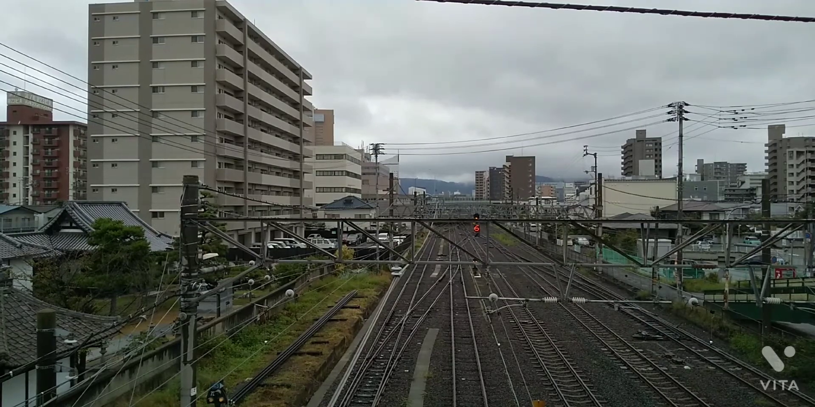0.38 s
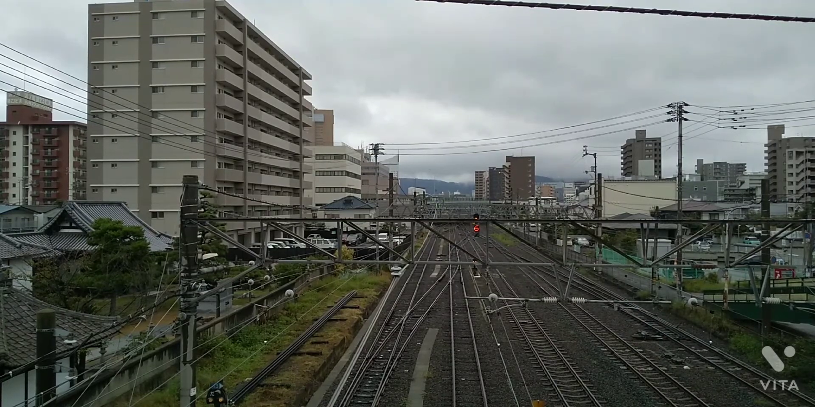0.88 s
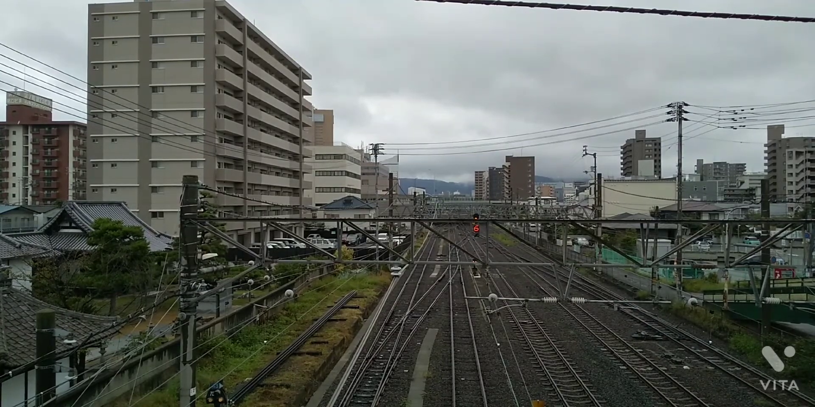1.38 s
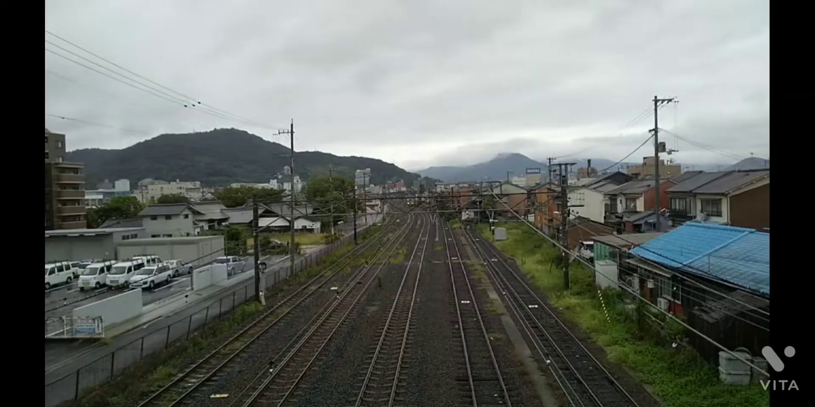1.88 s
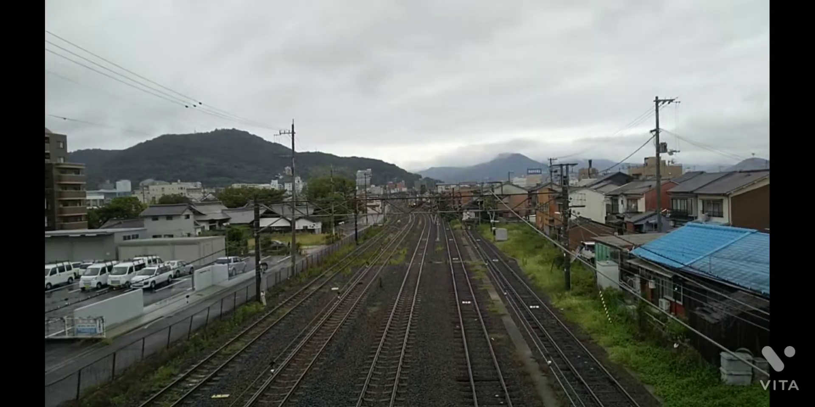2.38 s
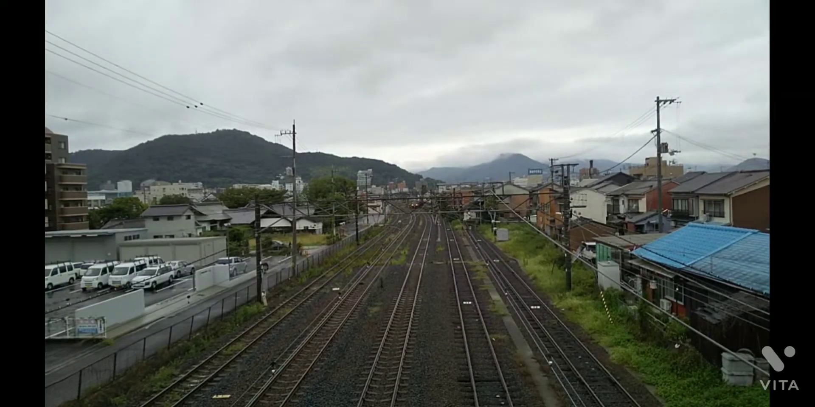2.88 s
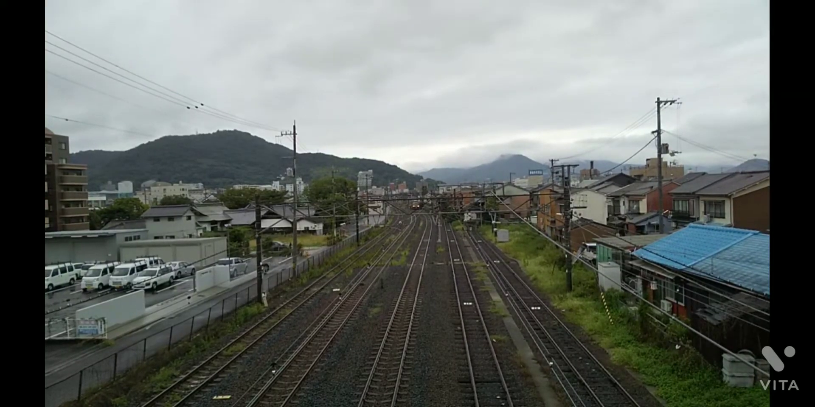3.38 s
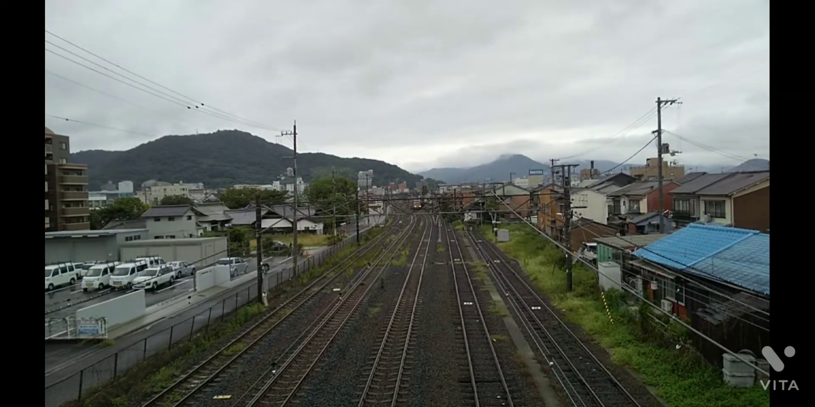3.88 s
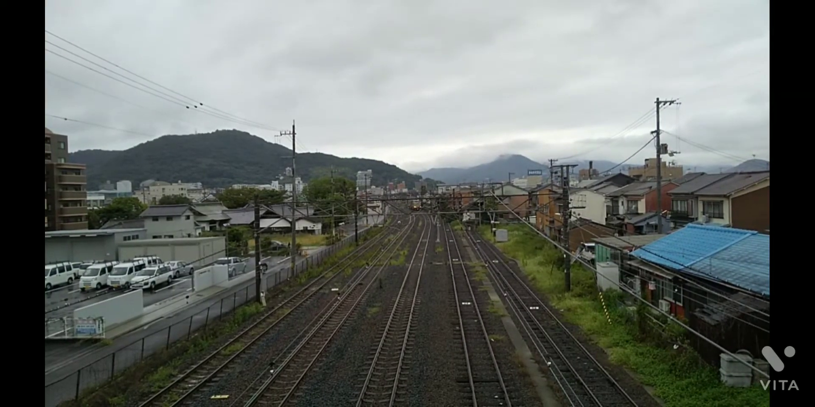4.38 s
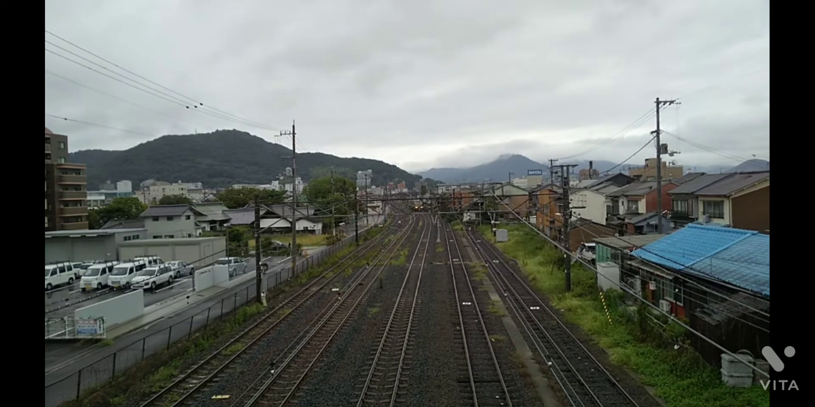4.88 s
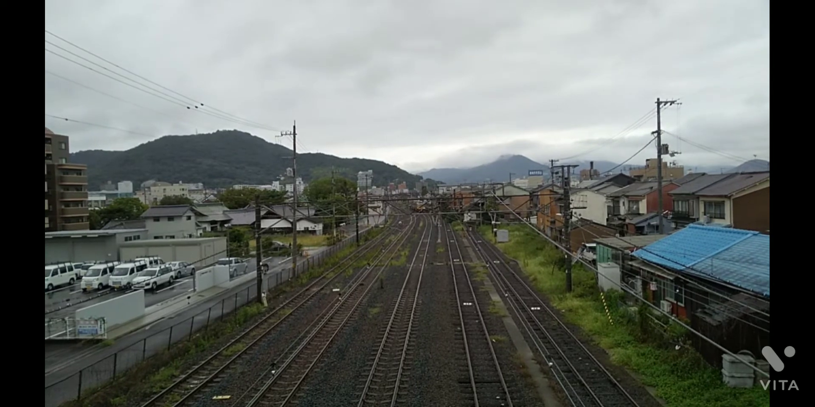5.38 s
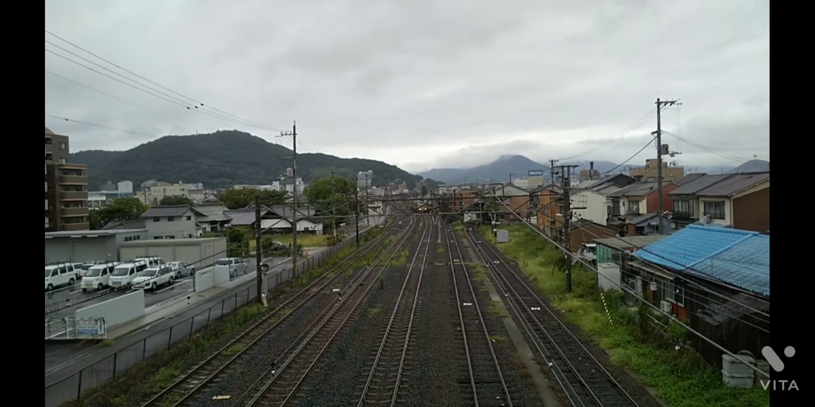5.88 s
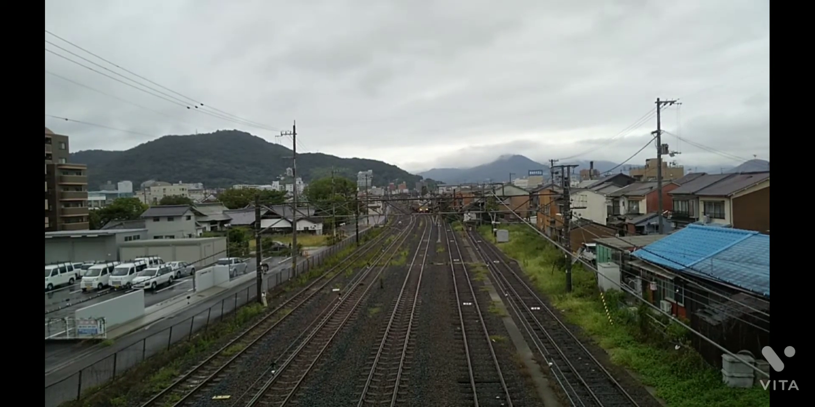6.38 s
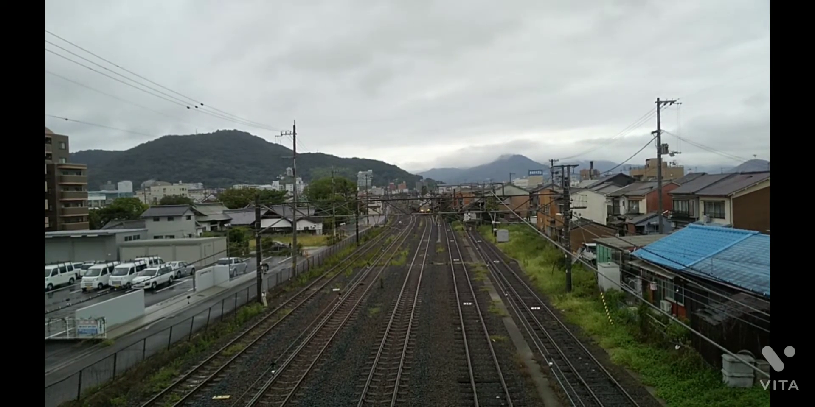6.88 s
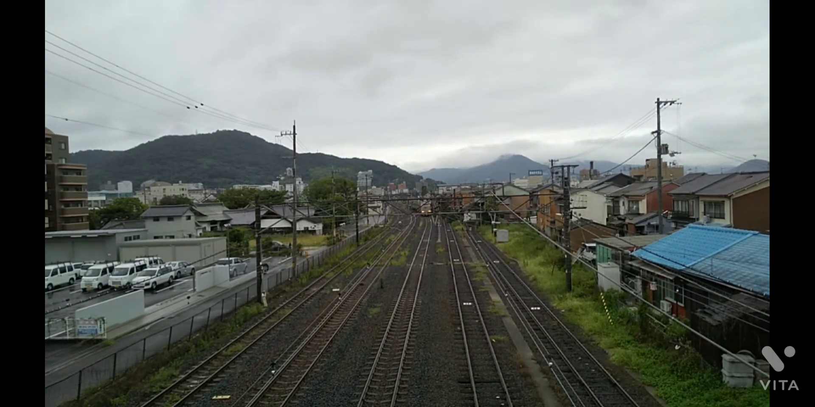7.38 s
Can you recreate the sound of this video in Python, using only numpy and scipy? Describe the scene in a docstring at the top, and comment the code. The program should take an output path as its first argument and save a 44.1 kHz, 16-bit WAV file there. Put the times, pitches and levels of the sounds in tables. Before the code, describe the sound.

From 0 to 1.5 seconds a diesel train drones close to the microphone: a strong, deep exhaust tone around 90 Hz swells and sinks beneath broad body roar, throbbing clatter and a thin, high whistling leak. A brief piercing wheel ping comes at 0.3, and a rough, gliding flange squeal at 1.4. The sound stops dead at 1.52. Silence lasts until about 1.96, when a much quieter outdoor rail yard quickly fades in: distant low rumble, town murmur and a wavering machine hum, strongest near 3.8. One insect gives short trilled chirps about every 0.28 seconds from 2.2 onward, over a fainter high insect chorus. Soft rustles, thin whines around 3 to 3.5, and tiny ticks at 2.0, 4.7 and 4.9 appear. At 6.9 a metal part clanks dully and rattles, again more weakly at 7.04, as lumpy wheel rolling continues to 7.5.

```python
"""Passing diesel and quiet rail yard

A diesel train drones close to the microphone: swaying sine exhaust orders over a broad roar of coloured noise,
with two wheel squeals made of unsteady tones. A hard edit stops it.
After a short silence a quiet yard fades in: far town rumble and hum, one insect of paired blips chirping in
rhythm over a farther chorus of trilling noise, small noise bursts, faint whines and ticks. At the end a metal
part clanks in ringing modes with a dull noisy body, and wheels roll in lumpy noise."""
import sys
import numpy as np
from scipy import signal
from scipy.fft import rfft, irfft
from scipy.io import wavfile
from scipy.ndimage import uniform_filter1d, map_coordinates

SR = 44100
rng = np.random.default_rng(int(sys.argv[2]) if len(sys.argv) > 2 else 0)


def magnitude_from_level(level_db):
    """Linear magnitude for a level in decibels (20 dB per decade)."""
    exponent = np.asarray(level_db, float) / 20
    return 10 ** exponent


def pcm_store(signal):
    """Save signal as 16-bit PCM."""
    levels = np.round(np.clip(np.atleast_2d(signal), -1, 1) * 32767)
    wavfile.write(sys.argv[1], SR, levels.astype(np.int16).T)


N = 330750  # samples, 7.5 s


def unit(x):
    """Scaled to rms 1."""
    return x / np.sqrt(np.mean(x ** 2) + 1e-20)


def curves(rows):
    """One value per sample for each column after the time."""
    s, *columns = np.transpose(rows)
    return [np.interp(np.arange(N) / SR, s, column) for column in columns]


def wobble(rate):
    """A smooth random curve, rate knots a second."""
    knots = rng.standard_normal(int(N * rate / SR) + 4)
    return map_coordinates(knots, [np.arange(N) * rate / SR])


def rush(spectrum, patchy_db):
    """Coloured noise of rms 1 with patches of random gain in time and frequency."""
    hz, _, z = signal.stft(rng.standard_normal(N), SR, nperseg=2048)
    patches = uniform_filter1d(rng.standard_normal(z.shape), size=12, axis=0)
    patches = unit(uniform_filter1d(patches, size=3, axis=1))
    f, db = np.transpose(spectrum)
    colour = np.interp(np.log(hz + 1), np.log(f + 1), db, left=-120, right=-120)
    gain = magnitude_from_level(colour[:, None] + patchy_db * patches)
    return unit(signal.istft(z * gain, nperseg=2048)[1][:N])


def tone(hz, db, sway, rate):
    """A sine of given rms level whose phase sways at random (sway in radians, rate in knots a second)."""
    phase = 2 * np.pi * np.cumsum(hz * np.ones(N)) / SR + sway * wobble(rate)
    return np.sqrt(2) * magnitude_from_level(db) * np.sin(phase)


# slow drift of the far traffic rumble, before the fade-in: t/s, level/dB
RUMBLE_LEVEL = [(2.2, -52.5), (2.6, -55), (3.15, -52.5), (3.8, -53), (4.2, -54), (4.7, -52), (5.1, -53),
                (5.45, -52.5), (5.9, -53.5), (6.9, -51.5), (7.5, -52.5)]
# relative spectra of far traffic and town murmur: f/Hz, level/dB per Hz
RUMBLE_SPECTRUM = [(13, -60), (22, -38), (33, -22), (42, -5), (60, 1.5), (90, -5), (115, -7.5), (144, -6),
                   (174, -11.5), (205, -14.5), (300, -14.5), (390, -46)]
TOWN_SPECTRUM = [(120, -24), (200, -4), (361, -5.5), (500, -3.5), (893, -10.5), (1180, -10), (1630, -14.5),
                 (2180, -15.5), (3200, -27.5), (4160, -46), (7040, -120)]
# relative spectrum of open air with a blur of distant insects near 3800 Hz: f/Hz, level/dB per Hz
AIR_AND_INSECTS_SPECTRUM = [(1470, -28.5), (2500, -2), (3060, -8), (3800, -1.5), (4510, -11), (5600, -13.5),
                            (6300, -15.5), (7810, -18), (9350, -17), (14200, -16)]
# fade-in of the air and insect blur; the rumble and town fade by multiples of it: t/s, level/dB
YARD_FADE = [(1.96, -9.5), (2.12, -2), (2.22, 0)]
TOWN_DB, AIR_AND_INSECTS_DB = -58, -67.5  # rms once faded in


def yard():
    """Far traffic rumble, town murmur of machines, and open air with a blur of distant insects, as drifting noise."""
    (rumble_db,), (fade_db,) = curves(RUMBLE_LEVEL), curves(YARD_FADE)
    rumble = magnitude_from_level(rumble_db + 0.44 * wobble(7)) * rush(RUMBLE_SPECTRUM, patchy_db=1.27)
    town = magnitude_from_level(TOWN_DB + 0.24 * wobble(11)) * rush(TOWN_SPECTRUM, patchy_db=0.8)
    air_and_insects_db = AIR_AND_INSECTS_DB + 0.67 * wobble(3.1)
    air_and_insects = magnitude_from_level(air_and_insects_db) * rush(AIR_AND_INSECTS_SPECTRUM, patchy_db=0.6)
    return magnitude_from_level(1.5 * fade_db) * rumble + magnitude_from_level(0.72 * fade_db) * town + magnitude_from_level(fade_db) * air_and_insects


# a far machine, about its random waver: t/s, level/dB
HUM_LEVEL = [(1.96, -76.5), (3.2, -64.5), (3.8, -58), (5.5, -63), (6.2, -63.5), (7.5, -66.5)]
HUM_HZ = 140.5  # centre of the wavering pitch


def hum():
    """One low order of a far idling machine, wavering in pitch and level."""
    db, = curves(HUM_LEVEL)
    return tone(HUM_HZ + 1.474 * wobble(1.5), db + 2.4 * wobble(9), 0.57, 13)


# farther insects, about the trill: t/s, level/dB
CHORUS_LEVEL_DB = [(1.96, -85.5), (2.2, -83), (4, -82), (4.5, -79), (7, -76)]
# their relative spectrum: f/Hz, level/dB per Hz
CHORUS_SPECTRUM = [(3300, -23), (3600, 2), (3900, 9), (4150, -6), (4450, -32)]


def chorus():
    """Farther insects blur into a narrow hiss that trills close to the near insect's stroke rate."""
    trill = np.sin(2 * np.pi * np.cumsum(45 + 2.73 * wobble(3)) / SR)
    db, = curves(CHORUS_LEVEL_DB)
    return magnitude_from_level(db + 3.6 * trill + 2.0 * wobble(4.4)) * rush(CHORUS_SPECTRUM, patchy_db=4.5)


# faint far tones: start t/s, end t/s, f/Hz, level/dB at mid-swell, about a random waver
FAR_WHINES = [(2.92, 3.4, 1010, -70), (3.22, 3.58, 1158, -65.5), (7.06, 7.15, 654, -60),
              (7.36, 7.41, 643, -61)]


def whines():
    """Thin unsteady tones that swell and go."""
    t = np.arange(N) / SR
    out = np.zeros(N)
    for start, end, hz, db in FAR_WHINES:
        swell = np.sin(np.pi * np.clip((t - start) / (end - start), 0, 1)) ** .5
        out += swell * tone(hz, db + 3 * wobble(14), 0.82, 25)
    return out


# rustles and puffs, and the dull noisy body of the two clanks: t/s, level/dB rms before rise and decay,
# centre f/Hz, spread/octaves, rise time constant/s, 60 dB decay/s
NOISE_BURSTS = [(2.34, -64, 8500, .4, .02, .15), (3.097, -69, 5200, .2, .003, .2),
                (3.215, -67, 7000, .5, .02, .25), (6.91, -47.5, 1300, 1.1, .002, .12),
                (6.984, -68, 5850, .03, .002, .08), (6.98, -68, 6300, .2, .005, .2),
                (7.037, -51, 1000, 1.2, .005, .14), (7.079, -60, 7000, .04, .002, .03),
                (7.075, -69, 7500, .4, .01, .15)]


def bursts():
    """Rustles, puffs and the dull body of the clanks: short dying noises, each in its own bell-shaped band."""
    out, t = np.zeros(N + SR), np.arange(SR // 2) / SR
    hz = np.fft.rfftfreq(len(t), 1 / SR) + 1
    for s, db, centre_hz, width, rise, t60 in NOISE_BURSTS:
        band = np.exp(-.5 * (np.log2(hz / centre_hz) / width) ** 2)
        noise = unit(irfft(rfft(rng.standard_normal(len(t))) * band))
        out[round(s * SR):][:len(t)] += magnitude_from_level(db - 60 * t / t60) * (1 - np.exp(-t / rise)) * noise
    return out[:N]


# dry ticks near the microphone: t/s, peak level/dB, recovery to zero pressure/s
DRY_TICKS = [(2.0043, -42.5, .001), (4.6665, -42.5, .00012), (4.904, -49, .0002)]


def ticks():
    """A sudden pressure dip that recovers and overshoots."""
    t = np.arange(N) / SR
    out = np.zeros(N)
    for s, db, recovery in DRY_TICKS:
        age = np.clip(t - s, 0, None) / recovery
        out -= magnitude_from_level(db) * (t >= s) * (1 - age) * np.exp(-age)
    return out


# the near insect's chirps: last strong stroke t/s, peak level/dB about random luck, strokes in the swell
INSECT_CHIRPS = [(2.254, -58, 7.5), (2.535, -57.5, 7.5), (2.814, -56.5, 6.5), (3.096, -56.5, 6.5),
                 (3.38, -56.5, 5.5), (3.678, -57, 6.5), (3.963, -58, 5.5), (4.236, -58, 5),
                 (4.543, -58, 5.5), (4.825, -58.5, 5), (5.082, -58.5, 5), (5.382, -58, 6.5),
                 (5.68, -57.5, 6.5), (5.96, -58, 5.5), (6.241, -57.5, 4.5), (6.54, -57.5, 5.5),
                 (6.807, -58.5, 5), (7.106, -56.5, 6), (7.385, -57, 6)]
# the two blips of a stroke: lag t/s, f/Hz at the loudest stroke, change f/Hz a stroke away from it,
# level/dB down where the swell starts, level/dB lost per stroke squared after the loudest
STROKE_BLIPS = [(0, 4150, -45, 12, 1.6), (.0102, 3520, 18, 10, 2.5)]
STROKES_PER_S, LOUDEST_STROKE = 44.4, 1.2  # loudest is counted back from the last strong stroke


def insect():
    """Each stroke pairs a high falling blip with a lower one; a chirp swells, then stops; walls smear it."""
    out, t = np.zeros(N + SR), np.arange(SR // 50) / SR
    middle = .008  # s into the blip
    shape = np.exp(-.5 * ((t - middle) / .0025) ** 2)
    for s, db, swell in INSECT_CHIRPS:
        luck = rng.standard_normal((10, len(STROKE_BLIPS), 3))  # of pitch, timing and level
        for k in range(-1, 9):  # strokes back from the last strong one
            early = k - LOUDEST_STROKE
            for (lag, hz, step_hz, before_db, after_db), r in zip(STROKE_BLIPS, luck[k]):
                pitch = (hz + step_hz * abs(early)) * (1 + .012 * r[0])
                phase = 2 * np.pi * (pitch * t - 22000 * (t - middle) ** 2)  # falls 44 Hz a ms
                at = round((s - k / STROKES_PER_S + lag - middle + .0006 * r[1]) * SR)
                loss_db = (before_db / swell ** 2 if early > 0 else after_db) * early ** 2
                out[at:at + len(t)] += magnitude_from_level(db - loss_db + 1.3 * r[2]) * shape * np.sin(phase)
    tail_t = np.arange(SR // 3) / SR
    tail = rng.standard_normal(len(tail_t)) * magnitude_from_level(-60 * tail_t / 0.28)
    return out[:N] + magnitude_from_level(-7) * signal.fftconvolve(out, tail / np.linalg.norm(tail))[:N]


# wheels on rail, about random lumps: t/s, level/dB
ROLLING_LEVEL = [(6.89, -87), (6.93, -50), (7.0, -56), (7.07, -53.5), (7.2, -55), (7.32, -53.5),
                 (7.42, -53.5), (7.5, -53)]
# their relative spectrum: f/Hz, level/dB per Hz
ROLLING_SPECTRUM = [(150, -30), (260, -2), (600, -2), (1000, -5.5), (1500, -8), (2300, -13.5),
                    (3500, -20.5), (6000, -32.5), (14200, -38.5)]


def rolling():
    """Lumpy noise of wheels on rail, coming up around the first clank."""
    db, = curves(ROLLING_LEVEL)
    return magnitude_from_level(db + 1.68 * wobble(18)) * rush(ROLLING_SPECTRUM, patchy_db=2.2)


# blows on a metal part: t/s, strike level/dB of the first contact
BLOWS = [(6.911, -34.5), (7.04, -40.5)]
# modes of the metal: f/Hz, relative level/dB about random strength, 60 dB decay/s
METAL_MODES = [(270, -2, .06), (450, -1, .05), (640, 0, .05), (900, -3, .04), (1150, -2, .04),
               (1450, -5, .03), (1760, 0, .04), (2250, -5, .03), (2800, -10, .025), (3300, -11, .025)]
RATTLE_S, RATTLE_GROWS, RATTLE_LOSS_DB = .003, 1.5, 2.6  # first gap, each gap over the last, loss a contact


def clanks():
    """Each blow rattles on in ever wider, weaker contacts; all ring the same modes at new strengths."""
    out, t = np.zeros(N + SR), np.arange(SR // 4) / SR
    onset = 1 - np.exp(-t / .001)
    for s, db in BLOWS:
        for k in range(6):
            at = s + RATTLE_S * (RATTLE_GROWS ** k - 1) / (RATTLE_GROWS - 1)
            ring = np.zeros(len(t))
            for hz, level, t60 in METAL_MODES:
                strength = magnitude_from_level(level + rng.normal(0, 2.7) - 60 * t / t60)
                ring += strength * np.sin(2 * np.pi * (hz * t + rng.random()))
            ring *= onset / np.sqrt(len(METAL_MODES))
            out[round(at * SR):][:len(t)] += magnitude_from_level(db - RATTLE_LOSS_DB * k) * ring
    return out[:N]


# short squeal of a close wheel: t/s, f/Hz, level/dB before rise and decay, rise/s, 60 dB decay/s
SHORT_SQUEAL = (.274, 7760, -31, .006, .09)
PING_RING_DB, PING_RING_T60_S = -10, .4  # it rings on, weaker and rougher
# long squeal of a close wheel, about a random waver: t/s, f/Hz, level/dB
LONG_SQUEAL = [(1.368, 6447, -76), (1.378, 6387, -43.5), (1.394, 6340, -43), (1.404, 6460, -31.5),
               (1.438, 6500, -32.5), (1.447, 6530, -50), (1.465, 6630, -36), (1.488, 6670, -49),
               (1.497, 6700, -62), (1.52, 6650, -42)]
SQUEAL_MODE_HZ, MODE_DB, OCTAVE_DB = 6500, -46, -46.5  # rms about a waver, before the grip
SQUEAL_RISE_S, TIRES_S, TIRED_DB = .008, 1.492, -9  # mode and octave rise, then drop at TIRES_S


def squeals():
    """Stick-slip of a wheel flange: a ping, then a gliding tone and its rough octave by a steady wheel mode."""
    t = np.arange(N) / SR
    s, ping_hz, ping_db, rise, t60 = SHORT_SQUEAL
    age = np.clip(t - s, 0, None)
    ping = tone(ping_hz, ping_db - 60 * age / t60, .3, 160)
    ring_db = ping_db + PING_RING_DB - 60 * age / PING_RING_T60_S
    ring = tone(ping_hz, ring_db + 2.9 * wobble(90), .9, 250)
    short = np.clip(age / rise, 0, 1) ** 2 * (ping + ring)

    hz, db = curves(LONG_SQUEAL)
    grip = np.clip((t - LONG_SQUEAL[0][0]) / SQUEAL_RISE_S, 0, 1) ** 2 * magnitude_from_level(TIRED_DB * (t > TIRES_S))
    glide = (grip > 0) * tone(hz, db + 1.2 * wobble(150), .25, 160)
    mode = tone(SQUEAL_MODE_HZ, MODE_DB + 3 * wobble(110), 0.83, 250)
    octave = tone(2 * hz, OCTAVE_DB + 3.5 * wobble(150), .5, 200)
    fuzz = tone(2 * hz - 120, OCTAVE_DB - 3 + 4 * wobble(120), 1.1, 350)  # roughens the octave
    return short + glide + grip * (mode + octave + fuzz)


# nearness of the train, a gain on roar and clatter: t/s, level/dB
NEARNESS = [(0, 0.5), (.3, 0.5), (.65, -2), (1.05, -2.5), (1.3, -3.5), (1.52, -3)]
# relative spectra of body roar, clatter and whistling leak: f/Hz, level/dB per Hz
ROAR_SPECTRUM = [(13, -63), (30, -34.5), (45, -12), (62, 0.5), (93, -10), (115, -7.5), (165, -9),
                 (230, -10.5), (360, -12), (478, -11), (668, -24), (900, -21.5), (1200, -22.5),
                 (1560, -46.5)]
CLATTER_SPECTRUM = [(410, -28), (700, -3.5), (1190, -4), (1360, -3.5), (2450, -8.5), (4050, -20.5),
                    (6520, -30), (7300, -27), (7960, -26), (9140, -33), (14000, -37.5)]
WHISTLE_SPECTRUM = [(7000, -35), (7500, -12), (8050, 3), (8600, -8), (9200, -30)]
ROAR_DB, CLATTER_DB = -23.5, -30.5  # rms at a nearness of 0 dB
WHISTLE_DB, WHISTLE_FADE_DB_PER_S = -53, 2.5  # level at the start, about a flutter


def train():
    """Roar of the body; valve and wheel clatter throbs with the firing; a leak whistles around 8 kHz."""
    near_db, = curves(NEARNESS)
    firing_hz = curves(FIRING)[0]
    firing = np.cos(2 * np.pi * np.cumsum(firing_hz) / SR)
    roar = magnitude_from_level(ROAR_DB + near_db) * rush(ROAR_SPECTRUM, patchy_db=1.0)
    clatter_db = CLATTER_DB + near_db + 0.4 * firing + 0.3 * wobble(40)
    clatter = magnitude_from_level(clatter_db) * rush(CLATTER_SPECTRUM, patchy_db=1.33)
    whistle_db = WHISTLE_DB - WHISTLE_FADE_DB_PER_S * np.arange(N) / SR + 2.6 * wobble(90)
    return roar + clatter + magnitude_from_level(whistle_db) * rush(WHISTLE_SPECTRUM, patchy_db=1.5)


# the close exhaust's firing tone wanders, swells and cancels: t/s, f/Hz, level/dB
FIRING = [(0, 93, -7.5), (.03, 92.04, -14.5), (.25, 90.25, -14), (.31, 90.3, -28), (.39, 89.5, -43),
          (.53, 89.5, -20.5), (.57, 89.86, -37.5), (.61, 90.4, -21), (.7, 90.9, -22), (.76, 91.4, -16.5),
          (.85, 91.54, -48.5), (.935, 95.4, -18), (1.05, 92.1, -29.5), (1.21, 92.17, -18),
          (1.31, 91.7, -20), (1.41, 92.6, -16), (1.52, 93.6, -25.5)]
# weaker tones at 1.5 and 2 times the firing tone, about a waver: t/s, order 1.5 level/dB, order 2 level/dB
UPPER_ORDERS = [(0.0, -26.5, -29), (0.502, -29, -31.5), (0.584, -42.5, -32.5), (0.786, -29, -36),
                (1.092, -39, -41), (1.252, -44, -33), (1.422, -34, -32), (1.49, -32, -52.5),
                (1.52, -29, -47)]
# higher shaft tones, before their fade and waver: f/Hz, level/dB
SHAFTS = [(479.1, -41.5), (602.9, -45)]


def engine():
    """Low exhaust orders, slightly unsteady, and two shaft tones."""
    hz, db = curves(FIRING)
    mid_db, top_db = curves(UPPER_ORDERS)
    orders = tone(hz, db, 0.52, 16)
    orders += tone(hz * 3 / 2, mid_db + 2.5 * wobble(9), .7, 10)
    orders += tone(hz * 2, top_db + 3.4 * wobble(9), .7, 14)
    fading_db = np.interp(np.arange(N) / SR, [.85, 1.1], [2, -7])  # the gearbox moves away
    shafts = sum(tone(f, level + fading_db + 4 * wobble(9), 1.2, 22) for f, level in SHAFTS)
    return orders + shafts


# the silence between the two places: from t/s, to t/s
SILENCE = (1.52, 1.9625)


def scene():
    """Two places joined by an edit, with silence between."""
    t = np.arange(N) / SR
    cut = np.clip((SILENCE[0] - t) * 400, 0, 1)  # closes in 2.5 ms
    passing = (train() + engine() + squeals()) * cut
    background = yard() + hum() + chorus() + whines()
    details = bursts() + ticks() + insect() + rolling() + clanks()
    return (passing + (background + details) * (t > SILENCE[1]))[None]


def low_pass(x):
    """Removes everything above the highest recorded frequency."""
    return signal.sosfilt(signal.butter(12, 14150, fs=SR, output="sos"), x)


def record(dry):
    """The microphone drops the deepest bass, below 38 Hz."""
    low_cut = signal.butter(3, 38, "high", fs=SR, output="sos")
    mix = signal.sosfilt(low_cut, dry)
    return low_pass(mix)


dry = scene()
out = record(dry)
pcm_store(out)
```